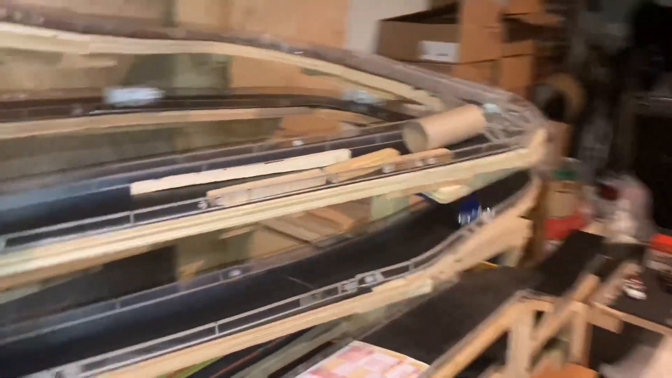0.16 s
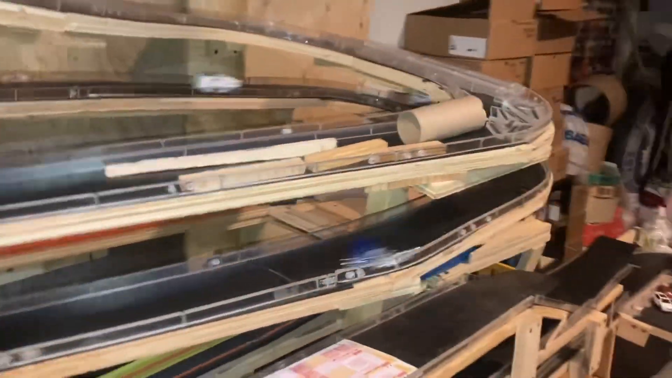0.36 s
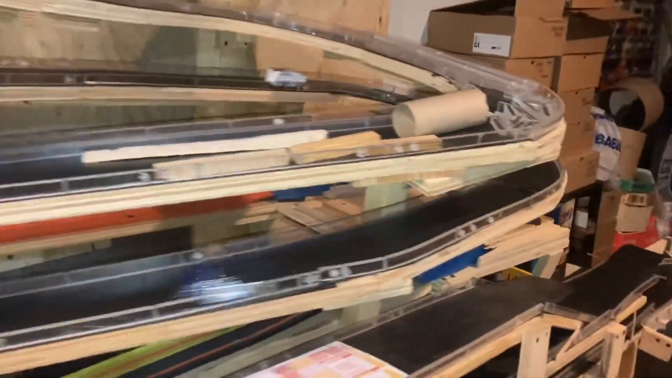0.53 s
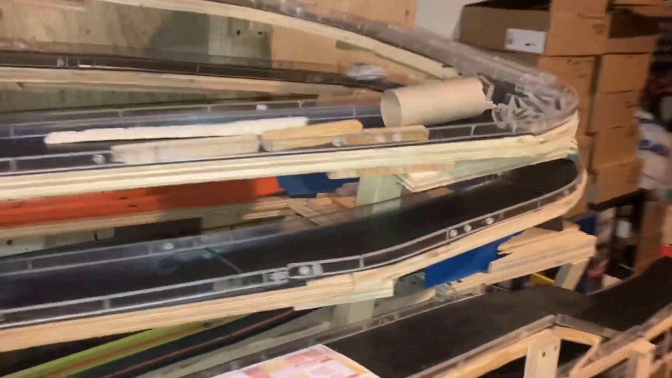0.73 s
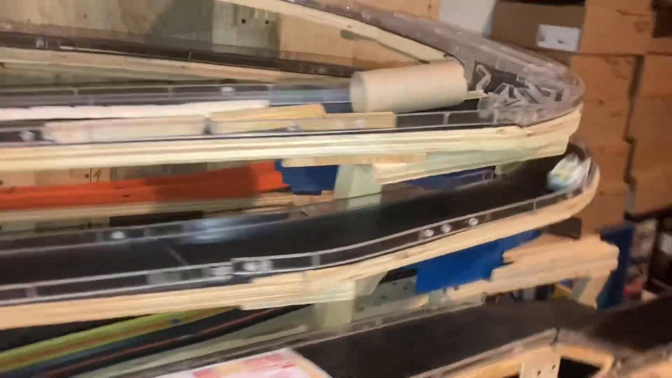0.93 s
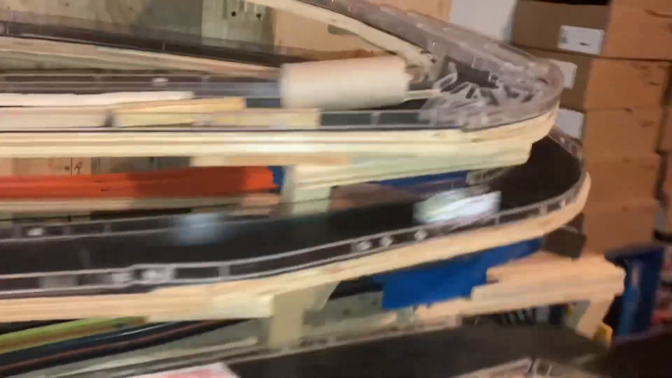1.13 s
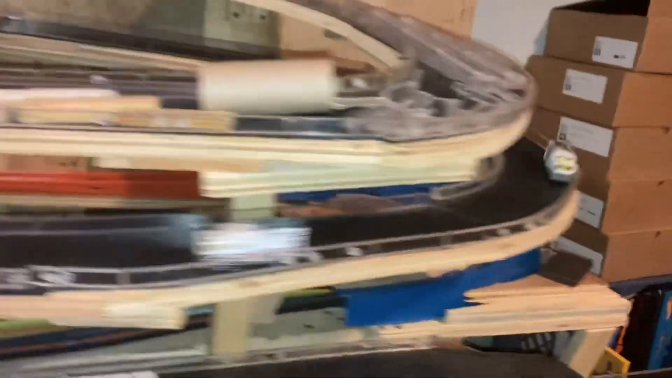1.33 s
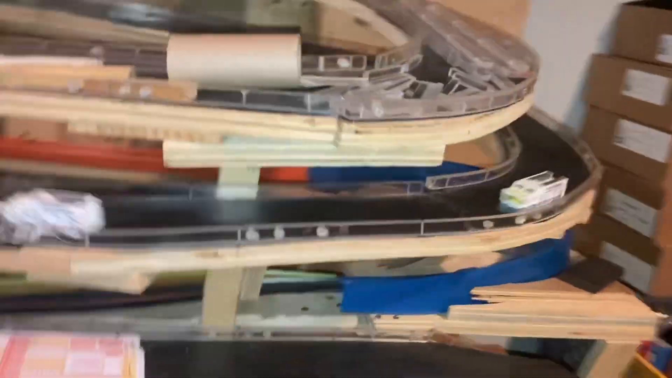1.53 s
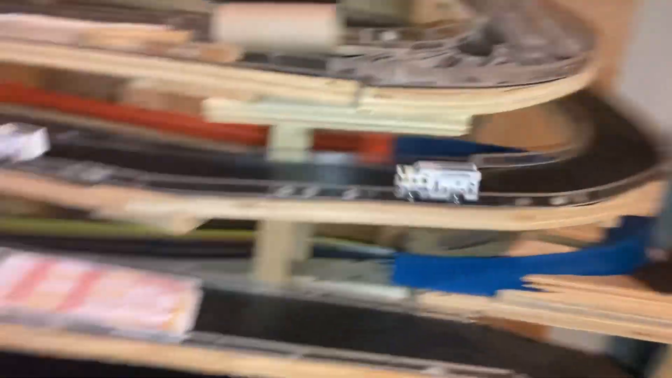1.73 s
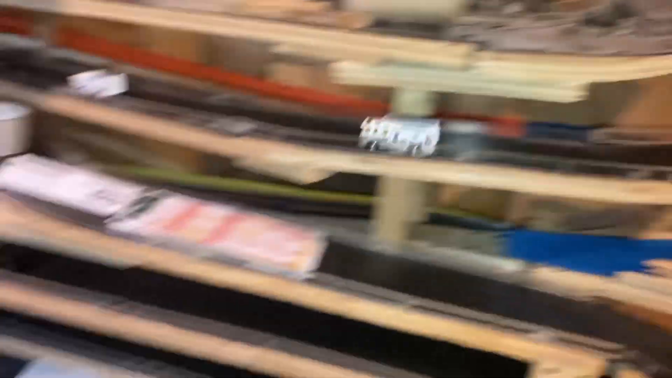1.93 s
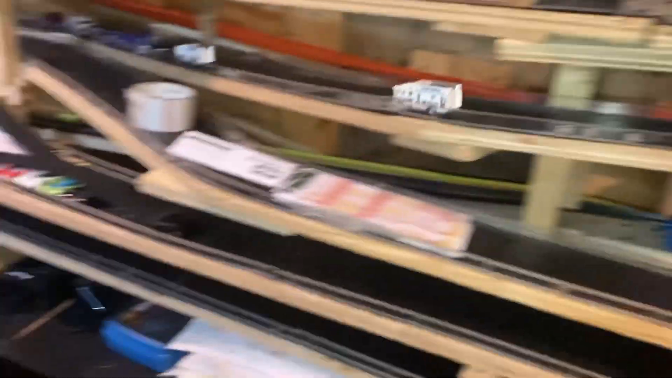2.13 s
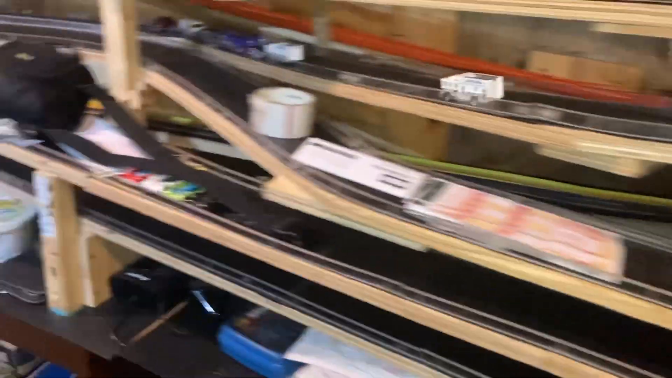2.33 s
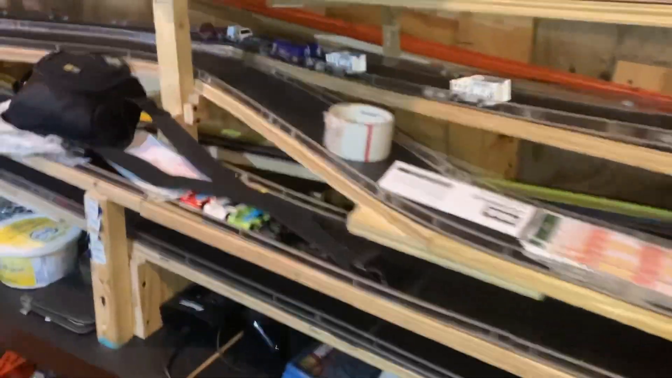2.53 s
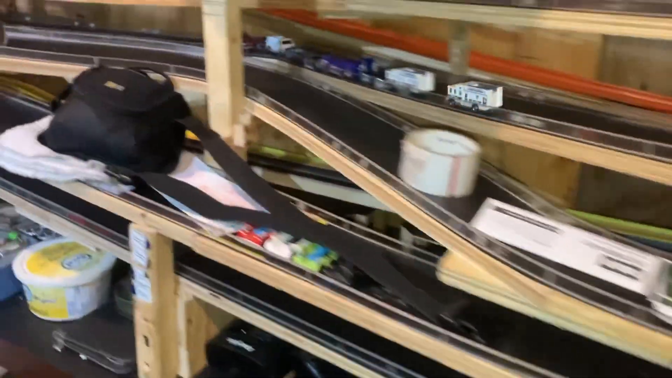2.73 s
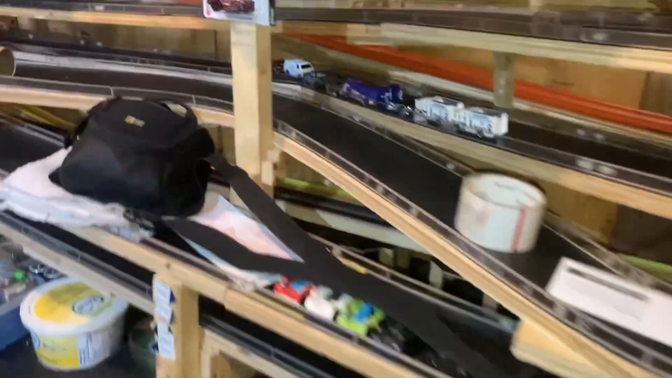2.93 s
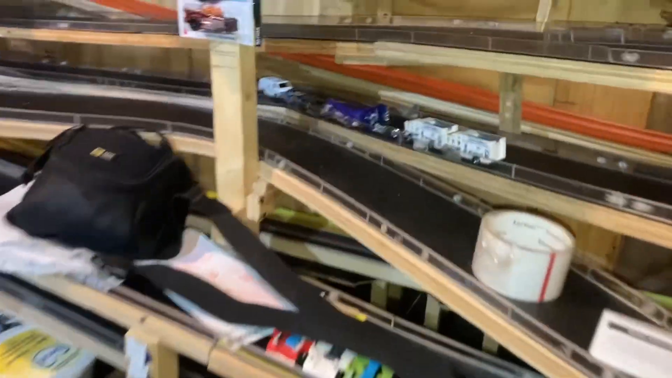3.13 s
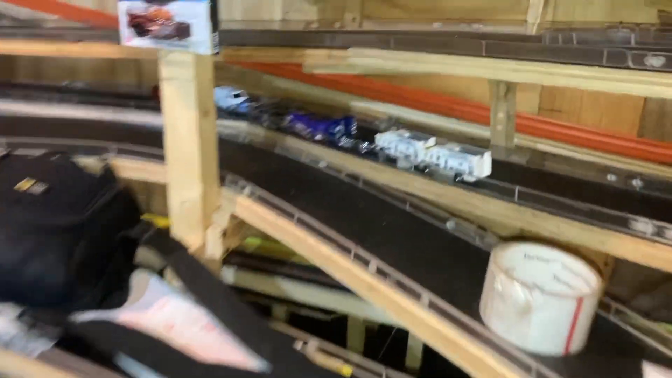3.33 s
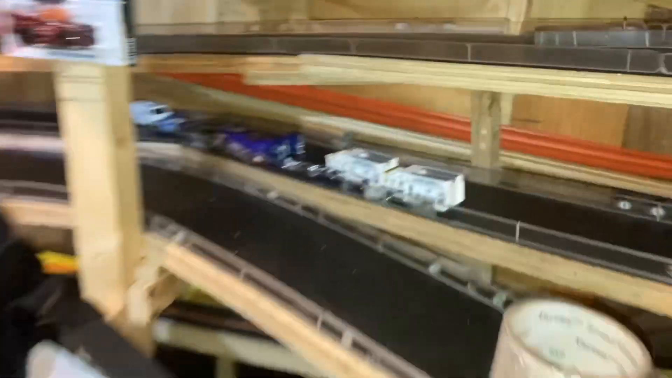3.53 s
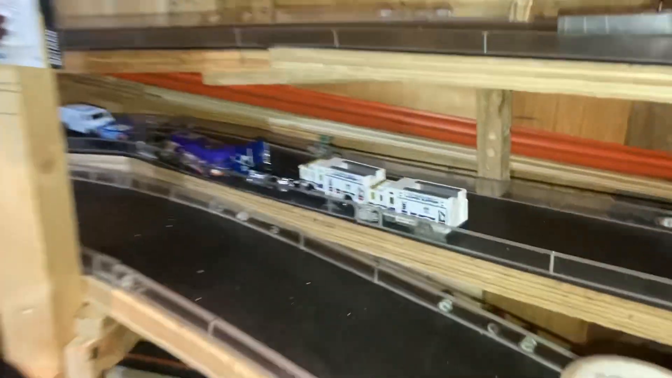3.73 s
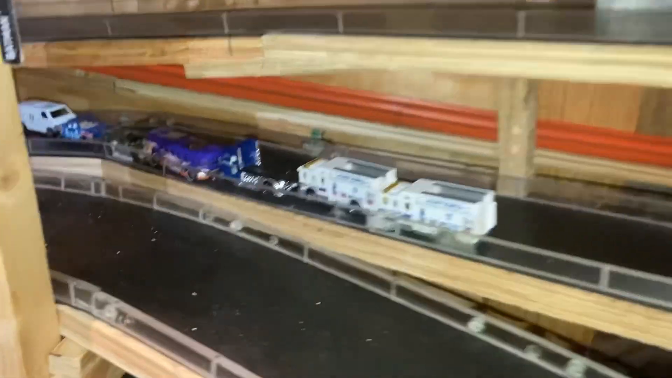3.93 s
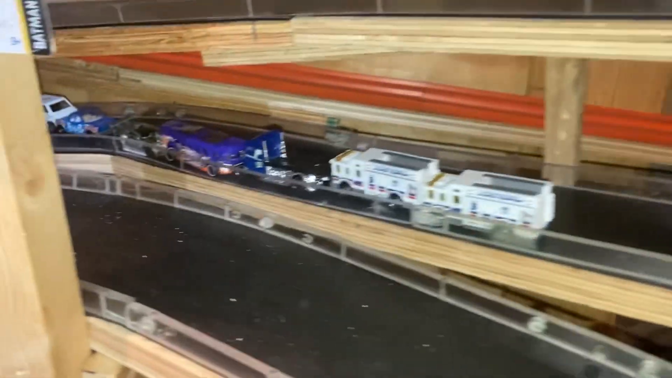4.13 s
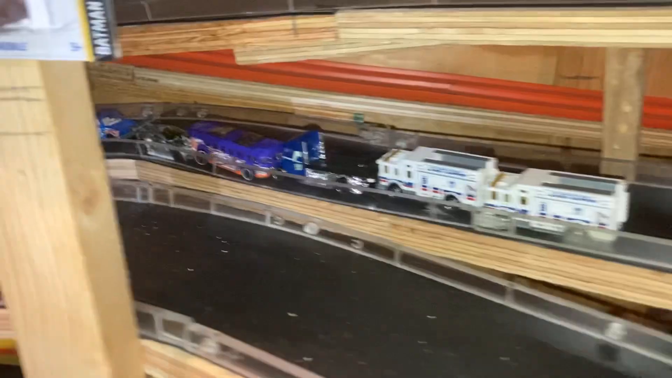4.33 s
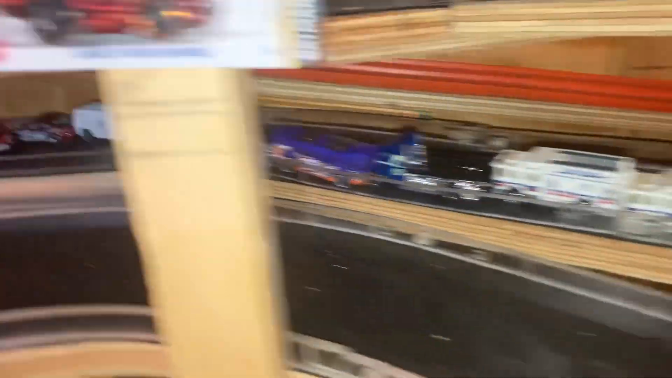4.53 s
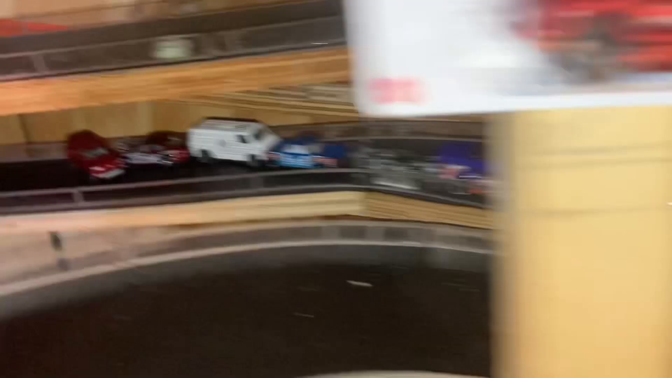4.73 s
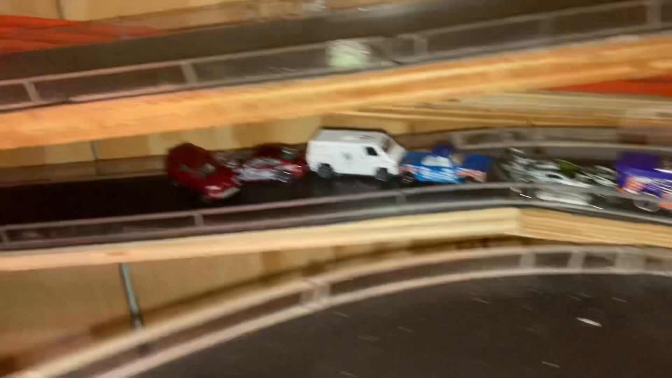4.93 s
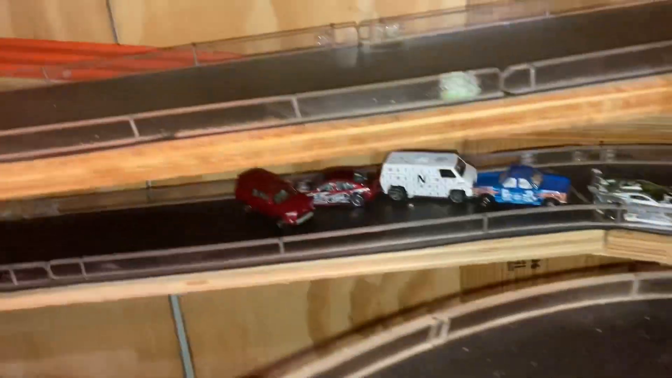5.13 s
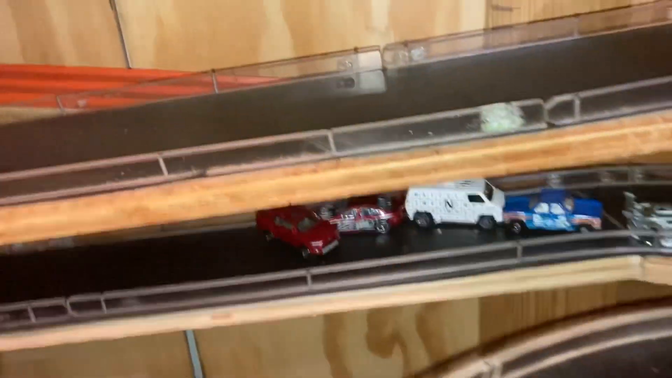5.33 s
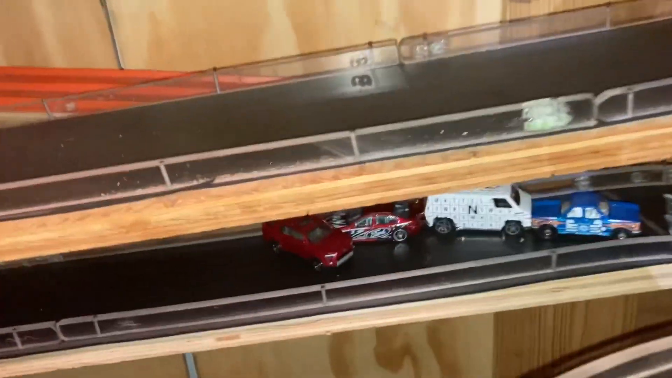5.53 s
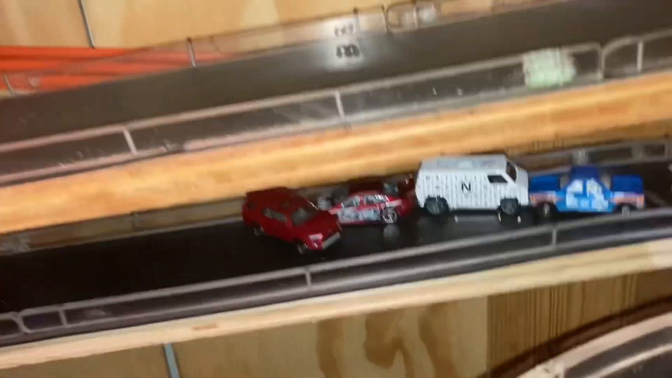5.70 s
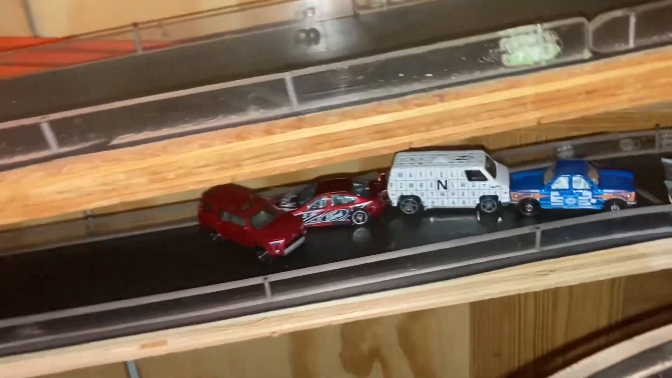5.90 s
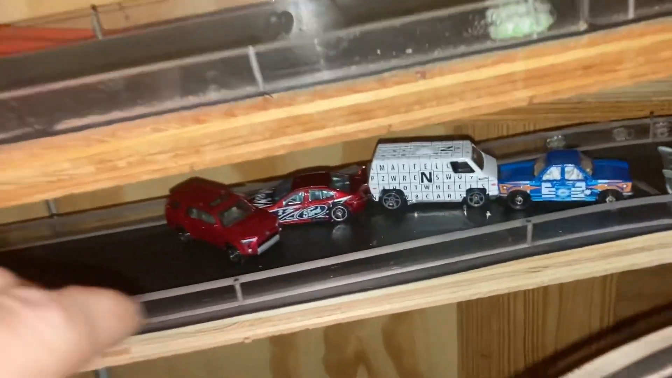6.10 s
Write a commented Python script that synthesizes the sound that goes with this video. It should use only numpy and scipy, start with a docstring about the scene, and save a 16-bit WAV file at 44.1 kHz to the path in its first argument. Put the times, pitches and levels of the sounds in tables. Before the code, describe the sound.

Several small die-cast toy cars run down a plastic track on a wooden frame, their wheels making a hollow, hissing rattle dotted with sharp metallic clacks as they knock together. The rolling fades and ends in a cluster of dull bumps a little past halfway. Then it is much quieter, with scattered dry ticks, brushing clothes and a short rub of a hand on the track, close to the microphone in a basement.

```python
"""In a basement, die-cast toy cars run down a plastic track on a wooden frame, bump into a queue and stop.
Rolling wheels excite a hollow resonance of the track while loose axles hiss and rattle. Impacts ring
the metal bodies and send bending waves through the wood; the deck drones and the floor booms.
Afterwards a person shifts about, with brushing cloth, dry ticks and dull bumps, near a stereo
microphone whose treble comes mainly from one port."""
import sys
import numpy as np
from scipy import signal
from scipy.fft import rfft, irfft, next_fast_len
from scipy.io import wavfile
from scipy.ndimage import uniform_filter1d, map_coordinates

SR = 44100
rng = np.random.default_rng(int(sys.argv[2]) if len(sys.argv) > 2 else 0)


def unload_audio(sound):
    """Save the sound as a 16-bit wav file, at the path given as the first command line argument."""
    columns = np.transpose(np.atleast_2d(sound))
    # keep every value between -1 and 1, then stretch to whole-number steps
    steps = np.round(np.clip(columns, -1, 1) * 32767)
    wavfile.write(sys.argv[1], SR, steps.astype(np.int16))


N = 276051

# Noise spectra. Each row: frequency in Hz, level in dB.
ROOM_TONE_SPECTRUM = [(18, -30), (45, 0), (200, -12), (600, -22), (1500, -22), (3000, -28), (8000, -32),
                      (13000, -36), (14500, -46), (16000, -64)]
BOARD_SPECTRUM = [(200, -27.5), (350, 1), (600, -1), (900, -1.5), (1500, -19)]
CLOTH_SPECTRUM = [(250, -1.5), (500, -1.5), (900, -5.5), (1350, 4.5), (1900, -1), (2600, -7.5),
                  (4000, -26.5)]
RASP_SPECTRUM = [(1600, -24.5), (2200, 0.5), (2800, -3.5), (4000, -1.5), (5200, -8), (7000, -33)]
SKIN_SPECTRUM = [(400, -30), (650, -10.5), (790, 1), (960, -9.5), (1150, 1), (1500, -28), (1800, -24.5)]
ROAR_SPECTRUM = [(300, -36.5), (800, -3), (1500, 2.5), (3000, -2.5), (4500, -3), (5500, -12), (6500, -20.5),
                 (8000, -34.5)]
HISS_SPECTRUM = [(4000, -16.5), (5500, 0), (6500, 7), (8000, 3.5), (11000, 6.5), (14000, -0.5),
                 (16000, -12)]
# Likeness of the two channels. Each row: frequency in Hz, left-right correlation.
COHERENCE = [(60, .92), (300, .9), (700, .7), (1400, .2), (3000, .2), (4500, .1), (5500, -.3)]
# Reverberation. Each row: frequency in Hz, time to fall 60 dB in seconds.
REVERB_TIMES = [(200, 0.17), (2000, 0.22), (10000, 0.051)]
# Steady shaking of the wood. Each row: time in seconds, deck drone in dB, board rumble in dB.
FRAME_LEVELS = [(0.0, -53, -46.5), (0.5, -53, -46.5), (0.9, -52.5, -43.5), (1.2, -56, -53.5),
                (1.42, -56, -49), (2.05, -60.5, -56.5), (2.3, -68.5, -63.5), (2.7, -65, -58.5),
                (3.15, -62, -57.5), (3.27, -64, -57), (3.32, -57, -61), (3.43, -53.5, -52.5),
                (3.52, -52, -50.5), (3.62, -56, -66.5), (3.68, -68, -67.5), (3.84, -71.5, -81),
                (4.3, -80.5, -91), (4.8, -82, -73), (5.2, -85.5, -96), (5.5, -73.5, -73),
                (5.75, -86.5, -78.5), (6.1, -86.5, -79), (6.26, -60, -78.5)]
# Jolts from steps and crashes. Each row: time in seconds, deck level in dB, floor level in dB.
FRAME_JOLTS = [(0.0, -75, -44), (0.1, -46, -48), (0.18, -54, -47.5), (0.56, -68, -47.5), (0.83, -53, -54),
               (0.949, -35, -38), (1.06, -53, -48.5), (1.29, -59, -54), (1.5, -80, -51), (1.74, -89, -51),
               (2.3, -58.5, -54), (2.41, -84, -62), (2.56, -73, -48.5), (2.861, -46, -49),
               (2.98, -59, -53.5), (3.22, -66, -62), (3.7, -67.5, -58), (4.11, -77.5, -69.5),
               (4.31, -80, -65), (4.479, -63.5, -63.5), (4.759, -70.5, -65), (4.932, -56.5, -71),
               (5.42, -92, -58.5), (5.599, -60.5, -59.5), (5.94, -65, -69.5), (6.26, -52, -65)]
# Clothes and hands brushing. Each row: start and length in seconds, level in dB,
# rasp and treble in relative dB.
BRUSH_STROKES = [(3.707, 0.028, -60.5, 2, -10), (3.88, 0.15, -77, 0, -21.5), (4.413, .006, -94, 11, 12),
                 (4.45, 0.05, -94, 3, 14), (4.644, 0.11, -70, -1.5, -3), (4.825, 0.098, -71, 2.5, 1),
                 (4.916, 0.051, -58, 3.5, -25), (5.382, .03, -71, -15, -32), (5.443, 0.052, -69, -15, -33),
                 (5.589, 0.041, -72.5, 0.5, 10.5), (5.782, 0.015, -85.5, 5, 0),
                 (5.905, 0.026, -100, -3, 20.5), (6.139, 0.1, -62, 1, 1.5), (6.227, 0.044, -56.5, -3, -9.5)]
# Blows on boards. Each row: start in seconds, level in dB, pitch in Hz, time to fall 60 dB in seconds.
BOARD_BUMPS = [(.062, -28.5, 554, 0.039), (.066, -27, 820, 0.03), (0.077, -28, 294, 0.1),
               (.224, -30, 678, 0.055), (0.803, -15.5, 321, 0.017), (0.821, -19, 289, 0.031),
               (0.887, -25, 315, 0.058), (0.946, -32, 196, 0.18), (1.466, -23.5, 194, 0.04),
               (3.211, -21, 246, 0.028), (3.229, -25.5, 253, 0.023), (3.303, -36, 201, 0.052),
               (3.333, -33, 250, 0.027), (3.357, -28.5, 226, 0.031), (3.378, -34.5, 260, 0.036),
               (3.403, -31, 222, 0.049), (3.424, -32, 255, 0.027), (3.449, -26.5, 205, 0.048),
               (3.465, -27, 212, 0.046), (3.495, -33.5, 199, 0.12), (3.535, -36, 235, 0.048),
               (3.566, -36, 210, 0.064), (4.444, -51, 316, 0.045), (4.468, -34.5, 112.4, 0.11),
               (4.47, -45.5, 212, 0.1), (4.503, -42.5, 136, 0.093), (5.574, -44, 402, 0.049),
               (5.934, -49.5, 213, 0.067), (6.168, -38, 333, 0.027), (6.229, -49, 198, .05),
               (6.199, -45, 121, 0.16)]
# Hard contacts. Each row: start in seconds, level in dB, dull part and thud in relative dB,
# left over right in dB.
DRY_TICKS = [(3.917, -48, -3, -15, 5), (4.0895, -61, 6, 6, 8), (4.126, -47.5, -4, -6, 8),
             (4.2849, -44, -3, -5.5, -11.5), (4.3398, -46, -6, -5, 7), (4.9192, -29, 6.5, -8, -1),
             (5.283, -66, -9, -10, -1), (5.321, -61, -6.5, 7, 4), (5.383, -60, -3, -6, 1),
             (5.4114, -64, 2, 17, 3), (5.456, -63, -11, -3, 2), (5.512, -63, -11, -3, 0),
             (5.53, -56, 2, 6, 0), (5.5503, -49.5, -9, 5, 10), (5.5669, -53.5, -3, 5, 0),
             (5.574, -51, -3, 10.5, 11), (5.8279, -38.5, -6, -8.5, -8), (5.857, -51.5, 3, 5.5, 3),
             (6.2505, -35.5, -9, -24, -1.2)]
# Resonances of a car body. Each row: frequency in Hz, bandwidth in Hz, gain in dB.
BODY_MODES = [(1170, 270, -8.5), (1856, 180, -1.5), (2195, 130, 6), (2725, 130, 2.5), (3060, 130, 2),
              (3600, 140, -2.5), (4610, 190, -1.5)]
# Hollow note of the track. Each row: time in seconds, frequency in Hz, strength in dB.
TRACK_RESONANCE = [(0, 1712, -16.5), (.3, 1446, -0.5), (.5, 1587, 2.5), (.65, 1878, 4), (.8, 1950, -5.5),
                   (1.08, 1737, -11), (1.25, 2105, -6.5), (1.55, 2270, -4), (1.8, 1750, -13),
                   (2.2, 1830, 4), (2.42, 1878, 11), (2.7, 1988, -7.5), (3.2, 1777, -11.5)]
# Rolling cars. Each row: time in seconds, wheel roar in dB, axle hiss in relative dB,
# left over right in dB.
ROLLING_LEVELS = [(0.0, -42, -2, 2.5), (0.25, -43.5, -6.5, 2), (0.52, -41, -5.5, 2), (0.75, -39, -8, 2),
                  (1.08, -41, -12, 1.5), (1.47, -39, -12, 1.5), (1.71, -41.5, -10.5, 3),
                  (2.03, -45.5, -9, -0.5), (2.21, -43, -6.5, -1.5), (2.35, -47.5, -8, -0.5),
                  (2.77, -45.5, -5.5, 0.5), (2.92, -51.5, -9, -4), (2.97, -50, -8.5, 0.5),
                  (3.2, -57.5, -7.5, -1.5), (3.41, -56, -7.5, 1.5), (3.53, -54, -17.5, -1.5),
                  (3.72, -78, -30, 12), (3.8, -72, -8, 5)]
# Knocks with a short ringing note: cars clacking, then a later dull knock on wood.
# Each row: time in seconds, level in dB, treble and rattle in relative dB, note in Hz,
# note level in relative dB, left over right in dB.
RINGING_KNOCKS = [(0.0553, -29, -2, -15, 4100, -31, -1.5), (0.0612, -22, -10, -20, 2220, -8, 3),
                  (0.063, -40.5, -17, -19, 1210, 12, 0.5), (0.1161, -41, 5, -17, 3900, -15, 2.5),
                  (0.2049, -32, -2.5, -17, 1250, -31, 11.5), (0.2229, -28.5, -19.5, -16.5, 1228, 7.5, 1),
                  (0.2932, -35, 0.5, -10, 1615, 2, 6), (0.3361, -35.5, -11.5, -15.5, 1400, 3, 2),
                  (0.3536, -34.5, 0.5, -14.5, 1910, -2, 4), (0.412, -39.5, 0.5, -18.5, 1750, -19, 3),
                  (0.4299, -36, 6, -14.5, 1880, -18, 7), (0.4534, -36.5, -2, -17, 1704, 6.5, 4),
                  (0.4983, -35.5, 3.5, -17.5, 2000, -9, 5.5), (0.538, -34.5, -8.5, -16, 1674, 7, 3),
                  (0.5115, -31, -10, -14, 1690, -4, 3), (0.617, -34, -3, -17, 1854, 1, 7.5),
                  (0.7951, -16.5, -6.5, -12, 1108, -7.5, -0.5), (0.7935, -34, -10, -19, 2810, 10, 6),
                  (0.853, -27.5, -5.5, -8, 1380, -7, 6), (0.888, -20.5, 3.5, -13, 2170, -2, 4),
                  (0.8875, -30.5, -10, -21, 1737, 7.5, 2), (0.8965, -24, -8.5, -10.5, 3175, 3.5, 1.5),
                  (0.922, -39, -9, -24, 3100, 13, 2.5), (0.9328, -30, -4.5, -4, 3093, 8.5, 1.5),
                  (0.959, -31, 7, -5.5, 1810, 2, -0.5), (0.9659, -22.5, -12.5, -16.5, 2390, -5, 6.5),
                  (0.964, -36, -10.5, -17.5, 3300, 6, -0.5), (1.066, -35, -13.5, -18.5, 1023, 4, 1),
                  (1.1374, -35.5, 1.5, -14, 2700, -8, 7), (1.2183, -30, -2.5, -11, 1650, -13.5, 4),
                  (1.244, -38, -11.5, -21, 3100, 8.5, 1.5), (1.2813, -26.5, 4, -18.5, 3150, -4, 4.5),
                  (1.283, -41.5, -10, -20, 967, 7, 1.5), (1.293, -42, -10.5, -21.5, 3100, 7, -1),
                  (1.294, -40.5, -10.5, -15, 2050, 8, 0.5), (1.324, -33.5, -9.5, -33, 3095, 9, 1.5),
                  (1.3824, -30.5, 7, -20.5, 2656, 4, 11.5), (1.4674, -37.5, -14, -11.5, 916, 6.5, 5),
                  (1.512, -36, -0.5, -12, 2230, -3, 2), (1.529, -40.5, -5, -15, 2100, 6, 1.5),
                  (1.581, -41.5, -4.5, -14, 2850, 9, 6), (1.6237, -28, -7.5, -8, 1505, -7, 6),
                  (1.6739, -28.5, 1.5, -14.5, 1370, -6, -8), (1.7764, -41, 3.5, -14.5, 2000, -8, 2.5),
                  (2.0194, -35.5, -10.5, -1.5, 2010, -19, 7), (2.0855, -29, -9.5, -16, 983, -8, 7),
                  (2.162, -36.5, 4, -22.5, 2180, 2, 6), (2.1722, -22.5, 2.5, -10, 3110, -2, 2.5),
                  (2.1905, -26.5, 2, -10, 3620, 2, -3.5), (2.192, -33.5, -5, -15, 2290, 10.5, 4.5),
                  (2.2288, -30.5, -4, -9, 1512, -5, 4), (2.231, -41, -10, -24, 3150, 12, 0),
                  (2.245, -42.5, -11.5, -20, 3240, 11, -0.5), (2.258, -39, -3.5, -15.5, 3210, 15.5, 1),
                  (2.2836, -33, -2.5, -15, 2000, 5, -1.5), (2.3655, -42, 2, -11.5, 2070, -13, -1),
                  (2.548, -39, 0, -13, 3130, 6, 0.5), (2.6025, -32.5, -8, -19.5, 2530, -4, 1.5),
                  (2.6358, -35, 4.5, -19, 1530, -4, 6), (2.6848, -39, 1.5, -14.5, 2080, -4, 4.5),
                  (2.7102, -39.5, 2, -13, 2160, -8.5, 3.5), (2.7332, -36.5, 0.5, -5.5, 1536, 1, 4.5),
                  (2.7896, -14, 3.5, -15, 2000, -9, 2), (2.7885, -32, -4, -20.5, 4550, 10, 0),
                  (2.7885, -30.5, -4, -20, 2483, 9, 0), (2.808, -38, -2.5, -12, 2130, 9, 0.5),
                  (2.8499, -31, -8.5, -7.5, 2110, -6.5, -3), (2.8498, -37, -8, -7.5, 4200, 6, 0),
                  (2.86, -36.5, -6, -10, 3700, -2, 0.5), (2.903, -41.5, -8, -18.5, 2130, 4, -1),
                  (2.904, -49, -10, -20, 3100, 7, 0.5), (2.9927, -40, -13.5, -23.5, 2150, 3, 2.5),
                  (3.135, -48, -7.5, 1.5, 2250, -5, 7.5), (3.388, -49, -8, -13.5, 2240, 4, 1),
                  (3.482, -37, -3.5, -15, 1460, -4.5, 5), (3.5632, -40, -47.5, -27, 3470, -4, -2),
                  (3.563, -54, -29, -25, 4600, 4, -1.5), (3.564, -46, -28, -5, 1504, -3, -2),
                  (3.6613, -48.5, -33, -7, 1446, -3, -5), (3.713, -42, -36, -18, 3980, -3, -2.5),
                  (3.714, -45.5, -35, -7, 1900, -8, -2.5), (3.739, -45.5, -8.5, -24, 4665, -5, 6.5),
                  (3.8768, -54, -33, -17, 1492, 2, 2.5), (3.877, -54, -30, -16, 2315, 4, 2),
                  (3.878, -59, -30, -15, 4400, 1, -2), (4.9225, -39.5, -44, 0.5, 1370, 2, -5),
                  (6.1685, -40.5, 1.5, -15, 1153, -6, -13)]

JOLT_RISE, DECK_FALL, FLOOR_FALL = 210, 510, 180  # dB per s
BRUSH_RISE, BRUSH_FALL = 910, 540  # dB per s
DRAG_S, DRAG_DB, DRAG_GROWTH = 6.14, -58.5, 68  # hand on the track edge: start, level then, dB per s
RATTLES_PER_S, RATTLE_DB, RATTLE_S = 220, -11.5, .0022  # rate, level against the roar, half length
ONSET_S, NOTE_SWELL_S = .0032, .0036  # soft attack of a knock; swell of the note before parts choke it
RING_PER_NOTE, RING_PER_DULL = .85, .5  # dB of body ring lost per dB of weaker note, of lost treble
PORT_SPLIT_HZ, TOP_HZ, TREBLE_LAG_S = 6380, 15850, .00022


def amp(db):
    """Amplitude ratio of a level in dB."""
    return 10 ** (np.asarray(db) / 20)


def unit(x):
    """The signal scaled to an rms of 1."""
    return x / np.sqrt(np.mean(np.abs(x) ** 2) + 1e-20)


def along(points, hz):
    """Interpolation of (Hz, value) points on a logarithmic frequency axis."""
    f, values = np.transpose(points)
    return np.interp(np.log(hz + 1), np.log(f + 1), values)


def curves(rows, t=None):
    """Linear interpolation of each column after the time, at times t or at every sample."""
    times, *columns = np.transpose(rows)
    return [np.interp(np.arange(N) / SR if t is None else t, times, c) for c in columns]


def wobble(rate):
    """Smooth random modulation with rate knots a second."""
    return map_coordinates(rng.standard_normal(int(N * rate / SR) + 4), [np.arange(N) * rate / SR])


def swells(starts, lengths, dbs, rise, fall):
    """Envelope of events that add in power; each rises, holds and falls, with slopes in dB per s."""
    t = np.arange(0, N, 64) / SR
    age = t - np.reshape(starts, (-1, 1))
    past_end = np.maximum(age - np.reshape(lengths, (-1, 1)), 0)
    db = np.reshape(dbs, (-1, 1)) + rise * np.minimum(age, 0) - fall * past_end
    return np.interp(np.arange(N) / SR, t, np.sqrt(np.sum(amp(2 * db), axis=0)))


def filtered(x, response):
    """Linear filtering: the spectrum is multiplied by a complex frequency response."""
    size = next_fast_len(N + SR // 2)
    return irfft(rfft(x, size) * response(np.fft.rfftfreq(size, 1 / SR)), size)[..., :N]


def ring(f, hz, width_hz):
    """Response of a damped oscillator, with gain 1 at resonance."""
    return 1j * f * width_hz / (hz * hz - f * f + 1j * f * width_hz)


def panned(db):
    """Left and right gains for a level difference."""
    return amp(np.array([db / 2, -db / 2]))


def rush(gain, patchy_db):
    """Partly coherent stereo noise of rms 1, shaped by gain(Hz, s) and by random patches of level."""
    hz, t, spectra = signal.stft(rng.standard_normal((2, N)), SR, nperseg=512)
    patches = uniform_filter1d(rng.standard_normal(spectra.shape[1:]), size=3, axis=0)
    patches = unit(uniform_filter1d(patches, size=4, axis=1))
    spectra = spectra * amp(patchy_db * patches) * gain(hz[:, None], t)
    pair = signal.istft(spectra, SR, nperseg=512)[1][:, :N]
    angle = lambda f: np.arccos(np.clip(along(COHERENCE, f), -1, 1)) / 2
    mid, side = filtered(pair, lambda f: np.array([np.cos(angle(f)), np.sin(angle(f))]))
    return unit(np.array([mid + side, mid - side]))


def steady_rush(spectrum, patchy_db):
    """Stationary noise: its mean spectrum is constant in time."""
    return rush(lambda hz, t: amp(along(spectrum, hz)), patchy_db)


def room_tone():
    """Ambient noise, faint and strongest in the bass."""
    return amp(-74.5) * steady_rush(ROOM_TONE_SPECTRUM, patchy_db=2.5)


def reverberation(x):
    """Exponential decay, each frequency at its own rate; long waves reach both ports alike."""
    hz, t, noise = signal.stft(rng.standard_normal((2, SR // 2)), SR, nperseg=256)
    alike = along(COHERENCE, hz)[:, None]
    spectra = np.array([noise[0], alike * noise[0] + np.sqrt(1 - alike ** 2) * noise[1]])
    decay = amp(-60 * t / along(REVERB_TIMES, hz)[:, None])
    tail = signal.istft(spectra * decay, SR, nperseg=256)[1]
    delayed = np.pad(x, (200, 0))[None]
    return signal.fftconvolve(delayed, tail / np.linalg.norm(tail[0]), axes=1)[:, :N]


def frame_drone():
    """Forced vibration: deck, floor and boards answer at low resonances; jolts swell deck and floor."""
    deck_db, board_db = curves(FRAME_LEVELS)
    jolt_s, deck_jolt_db, floor_jolt_db = np.transpose(FRAME_JOLTS)
    mid, side = rng.standard_normal((2, 2, N))
    drive = lambda k: np.array([mid[k] + .2 * side[k], mid[k] - .2 * side[k]])
    deck = filtered(drive(0), lambda f: (ring(f, 198, 26) - .7 * ring(f, 260, 90)) * ring(f, 230, 330))
    floor = filtered(drive(1), lambda f: (ring(f, 57, 26) + .45 * ring(f, 95, 40)) * ring(f, 62, 55))
    boards = amp(1.8 * wobble(25)) * steady_rush(BOARD_SPECTRUM, patchy_db=1.5)
    deck *= amp(2 * wobble(45))
    deck_gain = amp(deck_db) + swells(jolt_s, 0, deck_jolt_db, JOLT_RISE, DECK_FALL)
    floor_db = curves(ROLLING_LEVELS)[0] - 27.5  # the steady boom follows the wheel roar
    floor_gain = amp(floor_db) + swells(jolt_s, 0, floor_jolt_db, JOLT_RISE, FLOOR_FALL)
    return deck_gain * unit(deck) + floor_gain * unit(floor) + amp(board_db) * unit(boards)


def cloth_rustle():
    """Sliding friction of cloth gives three bands of noise that swell with each stroke."""
    starts, lengths, db, rasp_db, treble_db = np.transpose(BRUSH_STROKES)
    cloth = np.zeros((2, N))
    for spectrum, stroke_db, rest_db in ((CLOTH_SPECTRUM, db, -95.3),
                                         (RASP_SPECTRUM, db + rasp_db, -98.5),
                                         (HISS_SPECTRUM, db + treble_db, -100.5)):
        gain = swells(starts, lengths, stroke_db, BRUSH_RISE, BRUSH_FALL) + amp(rest_db)
        cloth += gain * steady_rush(spectrum, patchy_db=1.5)
    return amp(1.1 * wobble(60)) * cloth


def hand_drag():
    """Friction of skin on the hollow plastic track edge gives a growing, resonant noise."""
    age = np.arange(N) / SR - DRAG_S
    gain = amp(DRAG_DB + np.where(age > 0, DRAG_GROWTH, 1000) * age)
    return gain * steady_rush(SKIN_SPECTRUM, patchy_db=-2.0)


def through_wood(blows):
    """Dispersion of bending waves in the boards: the lower the frequency, the later it arrives."""
    delay = lambda f: np.exp(-4j * np.pi * .075 * np.sqrt(f) * (1 - np.sqrt(f / 1500) / 2))
    band = lambda f: ring(f, 320, 340) * ring(f, 260, 1500) / (1 + 1j * f / 1400) ** 2
    return filtered(blows, lambda f: delay(f) * band(f))


def board_bumps():
    """Damped free vibration: after a soft blow a board swells over a cycle and dies, sinking in pitch."""
    out, t = np.zeros(N + SR), np.arange(SR // 4) / SR
    sag = 1 - .1 * (1 - np.exp(-t / .037))
    for start, db, hz, t60 in BOARD_BUMPS:
        cycles = np.cumsum(hz * sag) / SR
        envelope = amp(db - 60 * (t / t60) ** 1.15) * (1 - np.exp(-t * hz)) ** 2
        out[round(start * SR):][:len(t)] += envelope * np.sin(2 * np.pi * cycles)
    return out[:N]


def dry_ticks():
    """Impulsive excitation: a hard contact radiates a snap into the air and pushes on the wood."""
    t = np.arange(300) / SR
    snaps, dulls, highs, pushes = np.zeros((4, 2, N + SR))
    for start, db, dull_db, thud_db, pan_db in DRY_TICKS:
        burst = amp(-60 * t / .0045) * rng.standard_normal(len(t))
        burst = amp(db + 19.5) * burst / np.linalg.norm(burst)
        at = round(start * SR)
        snaps[:, at:at + len(t)] += burst * panned(pan_db)[:, None]
        dulls[:, at:at + len(t)] += burst * amp(dull_db)
        highs[:, at:at + len(t)] += burst * amp(-35)
        pushes[:, at] += amp(db + thud_db + 31)
    snap = filtered(snaps[:, :N], lambda f: ring(f, 3500, 2500) ** 2 * ring(f, 3500, 3400))
    dull = filtered(dulls[:, :N], lambda f: ring(f, 1250, 1100) ** 2 * ring(f, 1200, 3000))
    treble = filtered(highs[:, :N], lambda f: ring(f, 10000, 9000))
    return snap + dull + treble + through_wood(pushes[:, :N])


def wheel_rattles():
    """Modal excitation: loose wheels ping one body mode at a time, as Gaussian pulses from any side."""
    run_s = ROLLING_LEVELS[-1][0]
    count = int(RATTLES_PER_S * run_s)
    onset, mode, phase, side = rng.random((count, 4)).T[..., None]
    detune = 1 + .06 * rng.standard_normal((count, 1))
    size_db = 1.4 * rng.exponential(size=(count, 1))
    hz, _, mode_db = np.transpose(BODY_MODES)[:, (mode * len(BODY_MODES)).astype(int)]
    k = np.arange(int(5 * RATTLE_S * SR))
    envelope = amp(mode_db / 2 - hz / 500 + size_db) * np.exp(-(k / SR / RATTLE_S - 2.5) ** 2)
    pings = envelope * np.sin(2 * np.pi * (hz * detune * k / SR + phase))
    samples = ((onset * run_s * SR).astype(int) + k).ravel()
    gains = np.cos(side * np.pi / 2), np.sin(side * np.pi / 2)
    return unit(np.array([np.bincount(samples, (pings * gain).ravel(), N) for gain in gains]))


def rolling_wheels():
    """Rolling noise: hard wheels drive the track's shifting resonance, and loose axles chatter."""
    def roar_colour(hz, t):
        """Resonance lifts the roar around the track's hollow note."""
        note_hz, note_db = curves(TRACK_RESONANCE, t)
        note = amp(note_db) * np.abs(ring(hz, note_hz, width_hz=650)) ** 2
        return amp(along(ROAR_SPECTRUM, hz)) * (1 + note)

    roar_db, hiss_db, pan_db = curves(ROLLING_LEVELS)
    judder = wobble(29.78)
    roar = rush(roar_colour, patchy_db=1.8)
    roar = unit(amp(1.5 * judder + 1.5 * wobble(150)) * roar)
    # about 30 axle slaps a second, each falling 60 dB in 20 ms
    slaps = (rng.random(N) < 30 / SR) * amp(2.5 * rng.exponential(size=N))
    chatter = 1 + .35 * signal.lfilter([1], [1, -amp(-60 / (.02 * SR))], slaps)
    hiss = unit(chatter * amp(1.1 * judder) * steady_rush(HISS_SPECTRUM, patchy_db=1.1))
    roar += amp(RATTLE_DB) * wheel_rattles()
    running = np.arange(N) / SR < ROLLING_LEVELS[-1][0]
    return running * amp(roar_db) * (roar * panned(pan_db) + amp(hiss_db) * hiss)


def ringing_knocks():
    """Impact excites the wood, a brief rough note and car body modes, which dull knocks hardly ring."""
    t, f = np.arange(7168) / SR, np.fft.rfftfreq(7168, 1 / SR)
    clacks, notes, pushes = np.zeros((3, 2, N + SR))
    bright = ring(f, 9200, 5700) * ring(f, 4800, 11000)
    age = t - 3 * ONSET_S
    onset = amp(-35 * np.maximum(-age / ONSET_S, 0) ** 2)  # the knock swells briefly to its peak at age 0
    after = np.maximum(age, 0)
    for time, db, treble_db, rattle_db, hz, note_db, pan_db in RINGING_KNOCKS:
        pan = panned(pan_db)[:, None]
        shape = onset * (amp(-60 * (after / .011) ** 1.5) + amp(rattle_db - 60 * after / .23))
        common, left, right = rng.standard_normal((3, len(t)))
        burst = shape * (common + .7 * np.array([left, right]))
        burst = amp(db) * burst * np.linalg.norm(shape) / np.linalg.norm(burst, axis=1, keepdims=True)
        # the modes differ a little from car to car
        body = sum(amp(mode_db + rng.normal(0, 2.5)) * ring(f, mode_hz * rng.normal(1, .02), width)
                   for mode_hz, width, mode_db in BODY_MODES)
        body_db = RING_PER_NOTE * min(note_db, 0) + RING_PER_DULL * min(treble_db + 16.5, 0) - 1.5
        resonance = .91 * ring(f, hz, .85 * hz) + amp(body_db) * body
        left_lead = rng.normal(.45, .4)  # radians by which the left port hears the note first
        phase = rng.uniform(0, 2 * np.pi) + np.array([[left_lead], [0]])
        note_gain = amp(db + note_db - .5) * after / NOTE_SWELL_S
        note_gain *= np.exp(-(after / NOTE_SWELL_S) ** 2 / 2)
        # loose parts roughen the note
        note_gain *= amp(1.5 * np.interp(t, np.arange(48) / 250, rng.standard_normal(48)))
        push_db = db - 13 - max(treble_db, -22)  # duller knocks push harder on the wood
        at = round((time - 3 * ONSET_S) * SR)
        span = slice(at, at + len(t))
        clacks[:, span] += irfft(rfft(burst) * (resonance * pan + amp(treble_db) * bright))
        notes[:, span] += note_gain * pan * np.sin(2 * np.pi * hz * t + phase)
        pushes[:, span] += amp(push_db) * shape * common
    return clacks[:, :N] + through_wood(pushes[:, :N]), notes[:, :N]


def scene():
    """Superposition of direct and reverberant sound; ticks and notes are drier than knocks."""
    knocks, notes = ringing_knocks()
    ticks, bumps, ambience = dry_ticks(), board_bumps(), room_tone()
    into_room = (amp(-4) * knocks + amp(-13.5) * notes + amp(-17) * ticks).mean(0) + amp(-8) * bumps
    impacts = knocks + notes + ticks + bumps + reverberation(into_room)
    return impacts + rolling_wheels() + frame_drone() + cloth_rustle() + hand_drag() + ambience


def record(dry):
    """Crossover: one port gives most treble, later on the left, inverted on the right; ends roll off."""
    high = lambda f: 1 / (1 + (PORT_SPLIT_HZ / (f + 1)) ** 24)
    half_lag = lambda f: np.exp(-1j * np.pi * f * TREBLE_LAG_S)
    main_treble = filtered(dry[0], lambda f: high(f) * np.array([half_lag(f), -1 / half_lag(f)]))
    weak_treble = filtered(dry[[1, 1]], lambda f: .2 * high(f))
    below_split = filtered(dry, lambda f: np.sqrt(1 - high(f) ** 2))
    passband = lambda f: (f < TOP_HZ) / np.sqrt((1 + (46 / (f + 1)) ** 10) * (1 + (f / 13500) ** 10))
    return filtered(main_treble + weak_treble + below_split, passband)


dry = scene()
out = record(dry)
unload_audio(out)
```